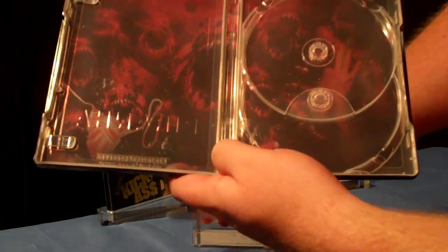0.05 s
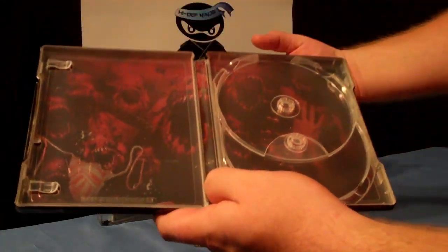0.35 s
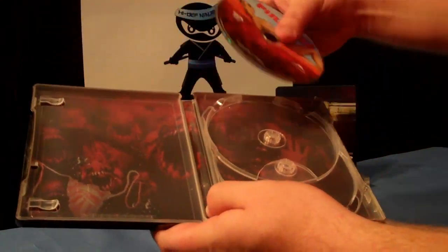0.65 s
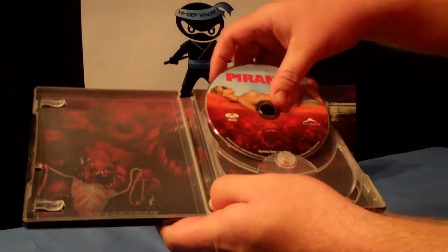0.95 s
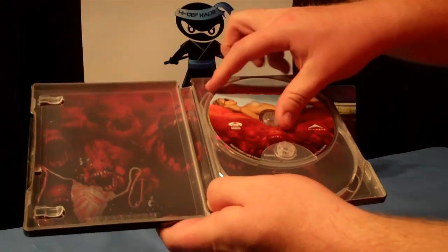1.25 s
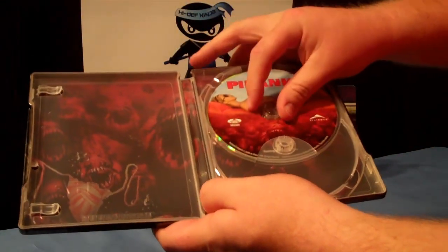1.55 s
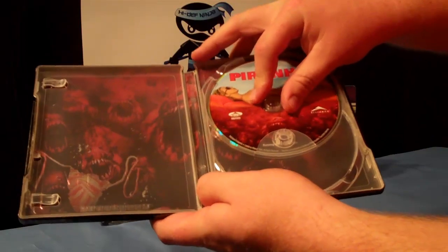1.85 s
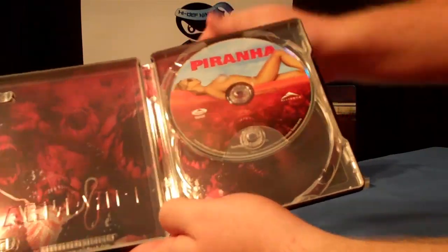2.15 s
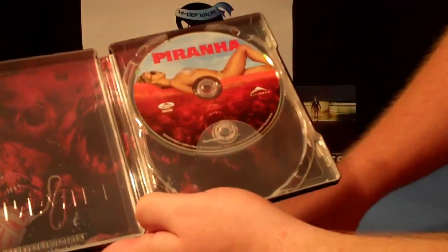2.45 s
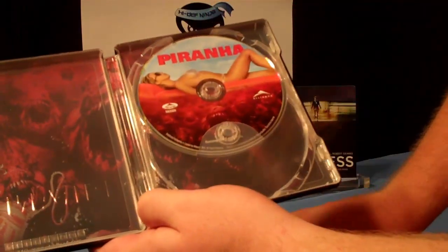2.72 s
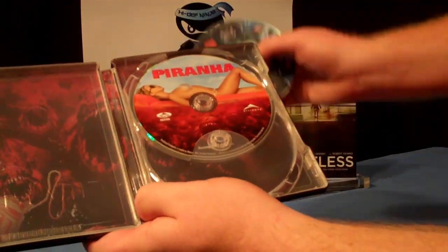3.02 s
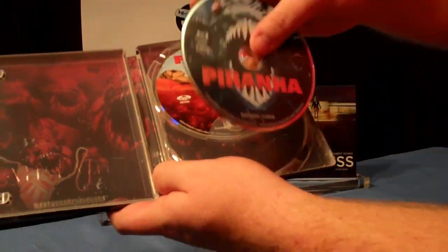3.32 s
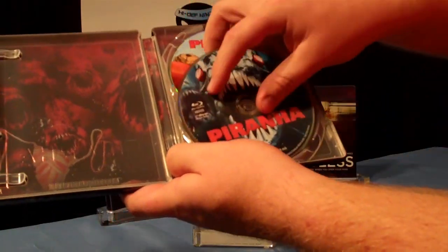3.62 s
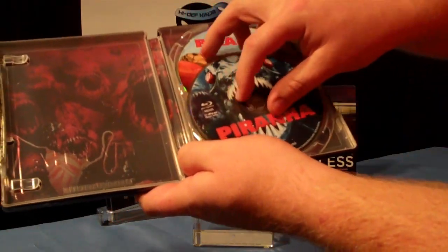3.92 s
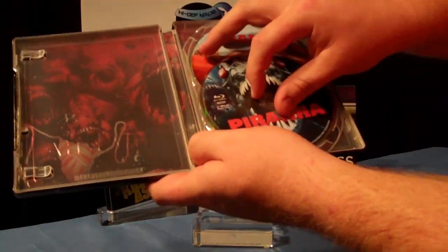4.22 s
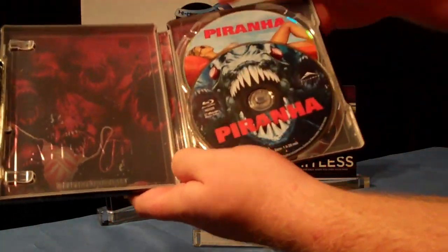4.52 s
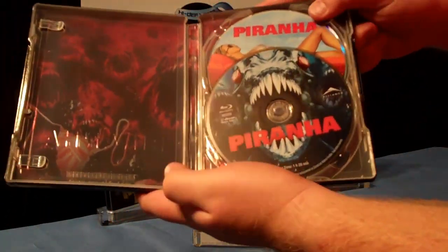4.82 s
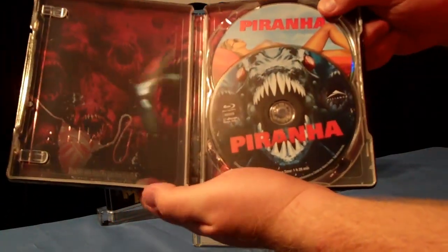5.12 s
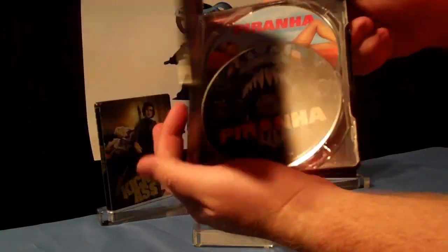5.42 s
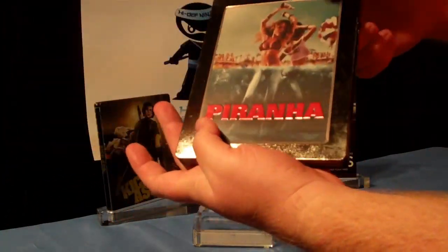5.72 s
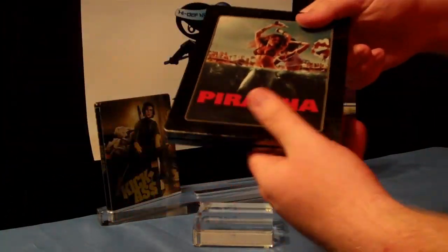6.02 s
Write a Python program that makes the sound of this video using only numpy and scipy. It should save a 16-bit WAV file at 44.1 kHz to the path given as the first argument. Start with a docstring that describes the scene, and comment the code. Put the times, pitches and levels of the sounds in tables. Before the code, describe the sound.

Close up in a small, fairly live room, a disc taps and scrapes into the plastic tray of a steel case, then snaps onto the hub with a loud double click. After soft rubbing of hands, a second disc clatters lightly in and clicks into place. A few faint ticks follow before the lid claps shut and the hollow case is knocked a few times, ringing briefly. A faint hiss and low drone lie underneath.

```python
"""Packing discs into a steel case

Two discs are laid into the plastic tray of a steel case and pressed until the hub snaps through them.
The lid claps shut and the hollow case is knocked as it is turned over a stand. Each impact excites
damped modes of the body struck. Hands rub on case and tablecloth, giving friction noise.
The room is small and fairly live, the stereo microphone close."""
import sys
import numpy as np
from scipy import signal
from scipy.fft import rfft, irfft
from scipy.io import wavfile

SR = 44100
rng = np.random.default_rng(int(sys.argv[2]) if len(sys.argv) > 2 else 0)


def unload_wav(signal):
    """Save mono or channel-first audio to the path in sys.argv[1] as 16-bit WAV at rate SR, clipped to [-1, 1]."""
    wavfile.write(
        sys.argv[1],
        SR,
        np.round(np.clip(np.atleast_2d(signal).T, -1, 1) * 32767).astype(np.int16),
    )


N = 276507
TIME = np.arange(N) / SR
CUTOFF_HZ = 11000
TAP_ROOM_DB = -8   # share of a tap sent to the room

# Table levels are relative; bass and treble are taken against the middle band.
# Impacts on the case: the columns of blows(), then shell ring/dB, panel f/Hz
CASE_KNOCKS = [(5.561, -32, -12, -1.5, 882, -3, 0.035, -6, -55, 870),
               (5.5625, -26.5, -12, -2.5, 1870, 2, 0.02, -10.5, -53, 866),
               (5.5648, -33, -11.5, -1.5, 2990, 2, 0.014, -9, -60, 876),
               (5.6721, -48, -6, -2.5, 6500, 1, 0.019, -15, -53, 870),
               (5.782, -40, -11, -1.5, 1300, -2, 0.043, -8, -57, 872),
               (5.786, -39, -12, -7, 1815, -3, 0.037, -6, -56, 896),
               (5.8413, -36, -15, -13, 815, 5, 0.076, -10, -51.5, 811),
               (5.842, -41.5, -6.5, 4.5, 5570, 6, 0.011, -14.5, -66, 820),
               (6.158, -60, -7.5, -4, 790, -4.5, 0.08, 3, -69.5, 809),
               (6.229, -56, -8, -11, 1266, 9.5, 0.051, -13, -75, 800)]
# Modes of disc and tray: f/Hz, level/dB, T60/s
DISC_MODES = [(380, -10.5, 0.015), (798, -8.5, 0.086), (1152, -8.5, 0.016), (1277, -4, 0.069),
              (1360, -3, .04), (1560, -7, 0.081), (1758, 2, 0.029), (2192, -7.5, 0.079),
              (2650, -0.5, 0.045), (3110, 1, 0.026), (3310, -4.5, 0.028), (3830, 1, 0.025),
              (4395, 3, 0.032), (5120, 1, 0.023), (6640, -10.5, 0.01)]


def hub_snaps():
    """Snap-through: the hub gives way suddenly, and the impulse excites its modes."""
    snaps = [(1.6254, -19, -10, 8, 4740, -1.5, 0.0332, -26), (1.6283, -25.5, -13, 4.5, 2250, 2, 0.07, -27),
             (1.6681, -19, -10.5, 5.5, 3670, -12, 0.05, -9), (1.6703, -19, -16.5, 1.5, 2016, 14, 0.04, -13),
             (1.6778, -31, -12, 0.5, 900, -7, 0.05, -16), (3.9384, -24, -19, -7.5, 1505, 6, 0.03, -12.5),
             (3.9398, -34.5, -14, 8, 5480, 10, 0.01, -15.5),
             (3.9436, -25.5, -15.5, -2, 1610, 4.5, 0.008, -13)]   # impulses of the hub: columns as in blows()
    modes = [(291.5, -2, 0.012), (788, -2, 0.083), (1165, 2, 0.054), (1480, 4, 0.044), (1900, -19.5, 0.39),
             (2154, 3.5, 0.031), (2360, -21, 0.42), (2420, -13, 0.18), (3000, -1, 0.023), (3230, -18, 0.26),
             (3430, -19.5, .33), (3670, -2, 0.027), (4070, -22.5, 0.54), (4680, 5, 0.032),
             (4950, -19, 0.35), (5630, -3, 0.039), (6630, -22, 0.13), (6620, -1, 0.024), (8360, -1, 0.016),
             (8250, -4.5, 0.013)]   # hub resonances: f/Hz, level/dB, T60/s
    return blows(snaps, modes, tick_db=6, crack_db=6, focus_hold=0.93, onset_s=0.00059,
                 level_db=0.66, size=SR // 3)


def case_knocks():
    """Impact excitation: the lid's clap and the knocks drive the modes of the hollow case."""
    modes = [(292, -9.5, 0.014), (434, -10.5, 0.036), (865, -1, 0.075), (940, -2.5, 0.031),
             (1140, -0.5, 0.028), (1410, 0.5, 0.036), (1920, -5, 0.045), (2210, -10, 0.11),
             (2660, -3, 0.048), (3240, 2.5, 0.023), (3860, 0, 0.035), (4500, 1.5, 0.02), (5330, -15, 0.034),
             (6170, 1, 0.016)]   # case resonances: f/Hz, level/dB, T60/s
    return blows(CASE_KNOCKS, modes, tick_db=2, crack_db=0.5, focus_hold=0.83, onset_s=0.0002,
                 level_db=2.14)


def shell_ring():
    """Free vibration: the steel shell rings on, its lowest tone gliding slightly up as the grip relaxes."""
    modes = [(914, 0, .35), (1072, -17, 0.29), (1440, -10.5, 0.5), (2051, -9, 0.34), (2100, -17, .35),
             (2590, -11, 0.36), (2745, -3, 0.24), (3042, -16, .45), (3822, -11, 0.25), (4800, -13, 0.3),
             (5560, -10, 0.2)]   # shell resonances: f/Hz, level/dB, T60/s
    panel_t60_s, rise_hz_per_s = 0.52, 140
    out, t = np.zeros(N), np.arange(SR * 2 // 3) / SR
    for s, *_, shell_db, panel_hz in CASE_KNOCKS:
        phase = 2 * np.pi * t * (panel_hz + rise_hz_per_s * t / 2)
        panel = from_db(3 - 60 * t / panel_t60_s) * np.sin(phase)
        add(out, s, from_db(shell_db + 3) * (panel + ring(modes, t, scatter_db=1.2)))
    return out


def disc_taps():
    """Elastic rebound: a disc touches again after each contact, more weakly; rows for blows()."""
    taps = [(0.244, -56, -4, -14, 943, 14, 0.14), (0.4234, -52, -7, -0.5, 2530, 3, 0.049),
            (0.8035, -26.5, -17, -3, 1624, 8.5, 0.025), (0.8042, -36.5, -14, 6, 3360, 9, .02),
            (0.8046, -42.5, -10, 7, 4440, 11, .016), (0.821, -45.5, -9, 5, 4500, -4, .02),
            (0.871, -46, -11, -4, 1950, -2, 0.035), (1.07, -41.5, -16, -7.5, 3500, 0.5, 0.11),
            (1.476, -44, -12.5, 0, 2050, -2, 0.038), (2.0265, -55, -6.5, -9, 979, -3, 0.044),
            (3.246, -64.5, -10, 9, 5400, -1, 0.033), (3.4011, -31, -21, -5.5, 1350, 4, 0.019),
            (3.4025, -39, -12, -7.5, 853, 6, 0.028), (3.4103, -40, -15, -7, 1300, 2, .016),
            (3.4199, -38, -14, -2.5, 1350, 2, 0.014), (3.4578, -37, -16, -5.5, 1430, 0, 0.013),
            (3.4735, -51, -11, 4, 3360, 4, .02), (3.5146, -42, -6.5, -11, 1206, 0, 0.07),
            (3.54, -56, -12.5, 2, 3090, 9, 0.027), (3.5669, -46, -11.5, -6, 1520, -5, 0.017),
            (3.716, -38, -21.5, 4, 5700, -4, 0.023), (3.7263, -43.5, -10, 2.5, 2980, -1, .02),
            (3.737, -42, -7, -4, 1500, -1, 0.019), (3.9037, -32.5, -17, -12.5, 1420, -4, .012),
            (3.9328, -33, -13, -8, 1113, -3, 0.034), (3.962, -38, -11, 4.5, 4150, -0.5, 0.0052),
            (4.3558, -51, -8.5, 7.5, 4590, -5, 0.033), (4.402, -53, -12.5, -1.5, 2040, -4.5, 0.026),
            (4.6103, -47.5, -13, -4.5, 2130, -1.5, 0.02), (4.6414, -51.5, -18, 5, 4000, 7, 0.023),
            (4.6417, -59.5, -14, 9.5, 5780, 10.5, 0.025), (4.718, -58.5, -10, 2.5, 5800, 1, .025),
            (4.736, -55.5, -9, -3, 3700, -2, 0.028), (4.754, -60, -10, 2, 3500, 3, .025),
            (4.701, -51, -15, -2, 2170, 0, 0.027), (5.1838, -56, -20, -3, 2400, -1.5, 0.029)]   # taps and bounces on the tray: columns as in blows(), without room/dB
    rebound_s = 0.018
    rows = []
    for s, db, bass_db, treble_db, *ringing in taps:
        rows.append((s, db, bass_db, treble_db, *ringing, TAP_ROOM_DB))
        rows.append((s + rebound_s, db - 21, bass_db + 9, treble_db + 5.5, *ringing, TAP_ROOM_DB))
    return rows


def disc_rattles():
    """Contact chatter: a loose disc strikes the hub at short, uneven intervals; rows for blows()."""
    bursts = [(1.69, 1.719, -38, 5, 3370), (3.409, 3.439, -51, 1, 2900)]   # spells of chatter: start/s, end/s, level/dB, treble/dB, f/Hz
    gap_s, bass_db, focus_db, t60 = 0.008, -16, -3, 0.015
    rows = []
    for start, end, db, treble_db, hz in bursts:
        for s in np.arange(start, end, gap_s):
            late, louder, higher = rng.uniform(-1, 1, 3)
            rows.append((s + late * gap_s / 3, db + louder / 2, bass_db, treble_db,
                         hz * 2 ** (higher / 3), focus_db, t60, TAP_ROOM_DB))
    return rows


def free_disc():
    """Light damping: held only by rim and hole, the first disc rings on after it meets the tray."""
    modes = [(1205, 4, 0.27), (1615, -1, .15), (1850, -7, 0.3), (2848, -11, .35), (3290, 3, .2),
             (3550, 1, .14), (4600, -12, .4)]   # free disc resonances: f/Hz, level/dB, T60/s
    out, t = np.zeros(N), np.arange(SR // 2) / SR
    add(out, s=0.804, sound=from_db(-49) * ring(modes, t, scatter_db=-8))
    return out


def slides_and_bursts():
    """Stick-slip friction: a disc slides in grainy slips. Very short noise bursts swell into two snaps."""
    swells = [(0.7, -57, -10, 8, 0.091, 0.034, 13.5), (1.19, -51, -18, 1.5, 0.21, 0.021, 7),
              (1.207, -30, -8, -1.5, 0.032, 0.031, 5.5), (1.6255, -30, -6, 7.5, 0.0026, 0.0018, -6),
              (1.6685, -24, -10, 3, 0.0048, 0.0024, -6), (2.85, -49.5, -6.5, 0.5, 0.13, 0.076, -3),
              (2.846, -46.5, -12.5, -6, 0.046, 0.036, 11), (3.43, -54, -7, -4, 0.014, 0.09, 1),
              (3.732, -37.5, -6.5, -8.5, 0.012, 0.028, -1), (4.338, -41.5, -10, -3, 0.017, 0.057, -14),
              (4.606, -49.5, -14, 4.5, 0.0043, 0.014, -1)]   # swells of grainy noise: columns as in strokes()
    return strokes(swells, slips_per_s=730, hiss_db=2, level_db=-0.5)


def skin_rubs():
    """Sliding friction: skin on case and cloth gives an almost smooth hiss."""
    rubs = [(2.56, -60, -6, 5.2, 0.12, 0.09, -9), (2.66, -51.5, -11, 4.3, 0.14, 0.15, -11),
            (4.28, -70, -4, 15.3, 0.13, 0.038, -17), (5.287, -62, -8, 10, 0.037, 0.051, -14),
            (5.335, -61.5, -9, 12.7, 0.074, 0.073, -11.5)]   # hand movements: columns as in strokes()
    return strokes(rubs, slips_per_s=2200, hiss_db=27, level_db=0)


def thumps():
    """Soft impact: hand, case and table give a low, heavily damped mode in a puff of dull noise."""
    bumps = [(0.804, -46, 330, 0.048), (1.205, -50, 340, .08), (1.215, -55, 190, 0.12),
             (1.624, -32, 270, 0.016), (1.667, -19.5, 100, 0.025), (1.667, -19, 250, 0.012),
             (2.499, -52, 217, 0.11), (2.688, -46.5, 219, 0.12), (2.703, -49, 155, 0.07),
             (2.853, -52.5, 512, 0.11), (5.56, -26.5, 353, 0.023), (5.559, -40, 150, 0.058),
             (5.842, -47, 250, 0.11)]   # soft contacts: t/s, level/dB, f/Hz, T60/s
    out, t = np.zeros(N), np.arange(SR // 3) / SR
    onset = 1 - np.exp(-t / 0.0017)
    for s, db, hz, t60 in bumps:
        puff = butter(rng.standard_normal(t.size), [hz / 1.8, hz * 1.8], "band")
        thud = np.sin(2 * np.pi * hz * t) + from_db(-1) * puff / rms(puff)
        add(out, s, from_db(db - 60 * t / t60) * thud * onset)
    return out


def grip_db(s):
    """Grip envelope: each move of the fingers swells, holds and lets go; the firmest sets the level."""
    moves = [(0, 1.55, -56.5), (1.0, 1.12, -50.5), (2.7, 3.16, -67.5), (3.46, 3.54, -59), (3.7, 4.23, -64),
             (4.7, 4.82, -62.5), (5.52, 6.06, -59)]   # shifts of grip: start/s, end/s, level/dB
    attack_s, release_s = 0.4, 0.44   # per 20 dB
    start, end, db = np.transpose(moves)[:, :, None]
    outside = np.maximum((start - s) / attack_s, (s - end) / release_s)
    return np.max(db - 20 * np.maximum(outside, 0), axis=0)


def tray_ticks():
    """Random impulses: the tray ticks under the fingers, louder in a firmer grip; rows for blows()."""
    ticks_per_s, low_hz, high_hz = 7.6, 1180, 4500
    bass_db, treble_db, focus_db, t60 = -12.5, -2.5, 0, 0.035
    when, height = rng.random((round(ticks_per_s * N / SR), 2)).T
    times = when * TIME[-1]
    pitches = low_hz * (high_hz / low_hz) ** height
    return [(s, db - 2.5, bass_db, treble_db, hz, focus_db, t60, TAP_ROOM_DB)
            for s, db, hz in zip(times, grip_db(times), pitches)]


def blows(rows, modes, tick_db, crack_db, focus_hold, onset_s, level_db, size=SR // 9):
    """Impulse response of a body to hard contacts; returns (direct sound, sound sent to the room)."""
    # Rows: t/s, level/dB, bass/dB, treble/dB, focus f/Hz, focus level/dB, crack T60/s, room/dB.
    # The focus is the mode that the contact point favours; it lasts focus_hold times the crack's T60.
    tick_spectrum = [(100, -2.5), (1000, -2.5), (3500, 1), (6000, 0.5), (8000, -7.5), (10500, -12.5)]   # the brief, bright contact itself: f/Hz, level/dB
    crack_spectrum = [(100, -14), (400, -0.5), (600, -4), (900, -3), (1700, 6), (2600, 0), (3500, 1),
                      (5000, -2), (7500, -3.5), (10500, -10.5)]   # crowded, fast-dying modes: f/Hz, level/dB
    out, t, attack = np.zeros((2, 2, N)), np.arange(size) / SR, SR // 100
    for s, db, bass_db, treble_db, focus_hz, focus_db, t60, room_db, *_ in rows:
        tick = noise(tick_spectrum, size) * from_db(-60 * t / 0.0064)
        crack = stereo_noise(crack_spectrum, size, side_db=-6) * from_db(-60 * t / t60)
        body = ring(modes, t, scatter_db=1.5)
        focus = ring([(focus_hz, 0, focus_hold * t60)], t, scatter_db=0)
        parts = (tick_db, tick), (crack_db, crack), (0, body), (focus_db, focus)
        hit = sum(from_db(part_db) * part / rms(part[..., :attack]) for part_db, part in parts)
        hit *= 1 - np.exp(-t / onset_s)   # the contact force takes a moment to build
        hit = from_db(db + level_db) * voiced(hit, bass_db, treble_db, size=attack)
        add(out[0], s, hit)
        add(out[1], s, from_db(room_db) * hit)
    return out


def strokes(rows, slips_per_s, hiss_db, level_db):
    """Amplitude envelope: friction noise rises and falls by 20 dB in the swell and fade times."""
    # Rows: peak t/s, level/dB, bass/dB, treble/dB, swell/s, fade/s, rasp/dB
    out, t = np.zeros((2, N)), np.arange(-SR // 3, SR // 3) / SR
    for s, db, bass_db, treble_db, swell, fade, rasp_db in rows:
        envelope = from_db(-20 * np.maximum(-t / swell, t / fade))   # in a slide, the hand's speed
        grit = friction(t.size, slips_per_s, slip_db=2.5, hiss_db=hiss_db)
        rasp = from_db(rasp_db) * envelope * butter(grit, [2000, 2500], "band")
        grit = voiced(grit + rasp, bass_db, treble_db, size=t.size)
        add(out, s + t[0], from_db(db + level_db) * envelope * grit)
    return out


def friction(size, slips_per_s, slip_db, hiss_db):
    """Stick-slip excitation: tiny uneven slips ring disc and tray over a smooth hiss; rms 1."""
    hiss_spectrum = [(100, 0.5), (300, 1), (700, -0.5), (2000, -1.5), (4000, -3), (6500, -5.5), (9000, -9),
                     (11000, -21.5)]   # sliding noise: f/Hz, level/dB
    slipping = rng.random(size) < slips_per_s / SR
    slips = slipping * from_db(slip_db * np.minimum(rng.exponential(1, size), 4))
    body = ring(DISC_MODES, np.arange(SR // 20) / SR, scatter_db=-0.5)
    grains = signal.fftconvolve(slips * rng.choice([-1, 1], size), body)[:size]
    x = grains / rms(grains) + from_db(hiss_db) * stereo_noise(hiss_spectrum, size, side_db=-3)
    return x / rms(x)


def ring(modes, t, scatter_db):
    """Modal superposition: damped sines whose strengths and signs vary with the contact point."""
    hz, level_db, t60 = np.transpose(modes)[:, :, None]
    strength = from_db(level_db + scatter_db * rng.standard_normal(hz.shape))
    sign = rng.choice([-1, 1], hz.shape)
    return np.sum(sign * strength * from_db(-60 * t / t60) * np.sin(2 * np.pi * hz * t), axis=0)


def voiced(x, bass_db, treble_db, size):
    """Contact hardness: sets bass and treble against a middle band of rms 1 over the first samples."""
    edges_hz = 220, 700, 3000, CUTOFF_HZ
    bands = [butter(x, band, "band", order=3) for band in zip(edges_hz, edges_hz[1:])]
    return sum(from_db(db) * band / rms(band[..., :size])
               for db, band in zip((bass_db, 0, treble_db), bands))


def with_reflections(x):
    """Early reflections: delayed, weaker copies add to the direct sound."""
    echoes = [(.0028, -26), (.0083, -21.5), (0.0121, -21.5)]   # reflection paths: delay/s, level/dB
    return x + sum(from_db(db) * np.array([np.interp(TIME - s, TIME, ch, left=0) for ch in x])
                   for s, db in echoes)


def room(x, side_db, build_s):
    """Diffuse field: each band stores the energy fed to it and returns it as fading noise."""
    decay = [(100, 0.21), (500, 0.38), (1500, 0.5), (4000, 0.52), (7000, .44), (11000, 0.37)]   # reverberation time: f/Hz, T60/s
    colour = [(100, -15), (300, -2), (600, 5.5), (1000, 5), (2000, 3), (4000, 2.5), (6500, 0), (10000, -7)]   # reverberant gain: f/Hz, level/dB
    edges_hz = np.geomspace(110, CUTOFF_HZ, 25)
    white = rng.standard_normal((2, 2, N))   # neighbouring bands get unrelated noise
    fields = white[:, :1] + from_db(side_db) * white[:, 1:] * [[1], [-1]]
    out = 0
    for k, band in enumerate(zip(edges_hz, edges_hz[1:])):
        hz = np.sqrt(band[0] * band[1])
        fed = leak(butter(x + 1e-18, band, "band") ** 2, build_s)
        stored = leak(fed, at_hz(decay, hz) / np.log(1e6))
        field = butter(fields[k % 2], band, "band")
        out = out + from_db(at_hz(colour, hz)) * np.sqrt(stored) * field / rms(field)
    return out


def background():
    """Ambient noise: a faint hiss and a low drone, lumpy because its band is narrow."""
    air_spectrum = [(13, -41), (22, -5.5), (55, -4.5), (113, -17.5), (146, -19.5), (311, -27.5), (364, -27),
                    (436, -25.5), (596, -25), (857, -30.5), (1000, -26.5), (1440, -28.5), (2360, -27.5),
                    (7590, -33), (10900, -63.5), (14200, -71), (22000, -120)]   # steady room noise: f/Hz, level/dB
    drone_levels = [(0, -57.5), (1.13, -51.5), (1.68, -55.5), (1.8, -61), (2.7, -66), (4.8, -65),
                    (6.27, -59)]   # envelope of the drone: t/s, level/dB
    rumble = butter(rng.standard_normal((2, N)), [44, 62], "band")
    drone = (rumble[0] + 0.3 * rumble[1] * [[1], [-1]]) / rms(rumble)
    drone_db = np.interp(TIME, *np.transpose(drone_levels)) - 2
    return from_db(-59) * stereo_noise(air_spectrum, N, side_db=-8) + from_db(drone_db) * drone


def noise(spectrum, size):
    """Spectral shaping: white noise takes a given colour; rms 1."""
    hz = np.maximum(np.fft.rfftfreq(size, 1 / SR), 1)
    gain = from_db(at_hz(spectrum, hz)) * (hz < CUTOFF_HZ)
    x = irfft(rfft(rng.standard_normal(size)) * gain, size)
    return x / rms(x)


def stereo_noise(spectrum, size, side_db):
    """Partial coherence: noise is mostly alike at two close capsules."""
    return noise(spectrum, size) + from_db(side_db) * noise(spectrum, size) * [[1], [-1]]


def leak(power, seconds):
    """Leaky integration: stored energy decays exponentially."""
    r = np.exp(-1 / (seconds * SR))
    return signal.lfilter([1 - r], [1, -r], power + 1e-18)


def butter(x, hz, kind, order=2):
    """Causal Butterworth filter."""
    return signal.sosfilt(signal.butter(order, hz, kind, fs=SR, output="sos"), x)


def at_hz(points, hz):
    """Interpolation on a log-frequency axis."""
    f, value = np.transpose(points)
    return np.interp(np.log(hz), np.log(f), value)


def add(track, s, sound):
    """Superposition of a sound on a track from time s on."""
    start = round(s * SR)
    track[..., start:start + sound.shape[-1]] += sound[..., :N - start]


def from_db(db):
    """Decibels to amplitude ratio."""
    return 10 ** (np.asarray(db) / 20)


def rms(x):
    """Root mean square."""
    return np.sqrt(np.mean(x ** 2) + 1e-20)


def scene():
    """Direct and diffuse fields add; all handling is close by, a little to the left."""
    snaps = hub_snaps()
    taps = blows(disc_taps() + disc_rattles() + tray_ticks(), DISC_MODES, tick_db=-1, crack_db=0,
                 focus_hold=0.77, onset_s=0.0002, level_db=-0.73)
    direct, sent = snaps + taps + case_knocks()
    swells = slides_and_bursts() + skin_rubs()
    finger_creep = from_db(grip_db(TIME)) * friction(N, slips_per_s=150, slip_db=5, hiss_db=7)
    handling = swells + finger_creep + thumps()
    diffuse = room(np.mean(sent + from_db(-9) * handling, axis=0), side_db=-3.5, build_s=0.0053)
    near = with_reflections(direct + handling + free_disc() + shell_ring())
    return (near + diffuse + background()) * from_db([[1.3], [-1.7]])


def record(dry):
    """Saturation: the loudest snaps overload the input and are flattened; a low-pass cuts the top."""
    overload = 0.95
    flattened = dry / (1 + (dry / overload) ** 6) ** (1 / 6)
    top_cut = signal.ellip(8, 0.1, 40, CUTOFF_HZ - 100, fs=SR, output="sos")
    return signal.sosfiltfilt(top_cut, flattened)


dry = scene()
out = record(dry)
unload_wav(out)
```